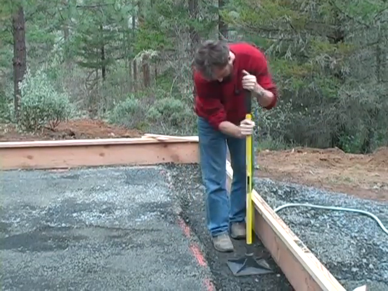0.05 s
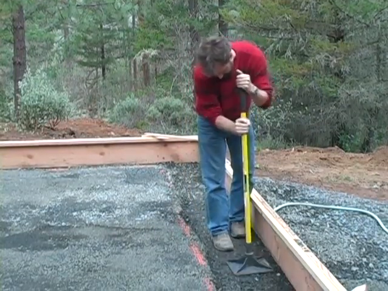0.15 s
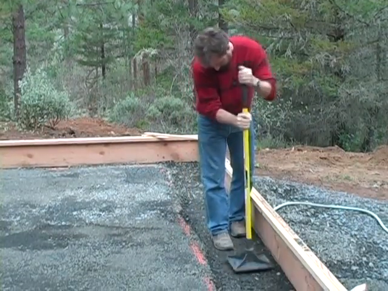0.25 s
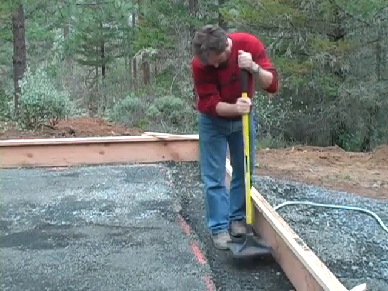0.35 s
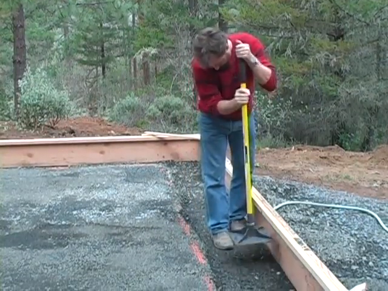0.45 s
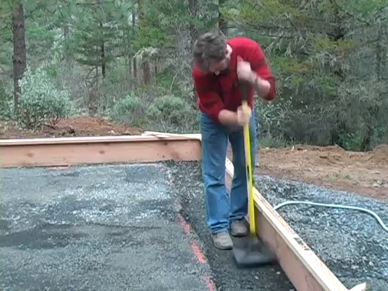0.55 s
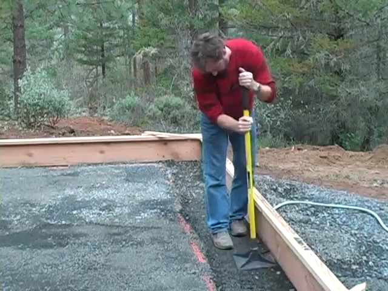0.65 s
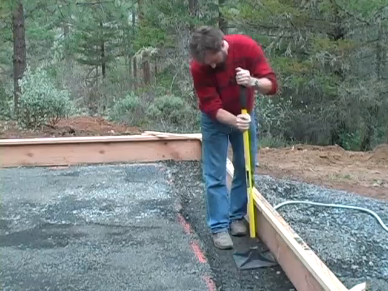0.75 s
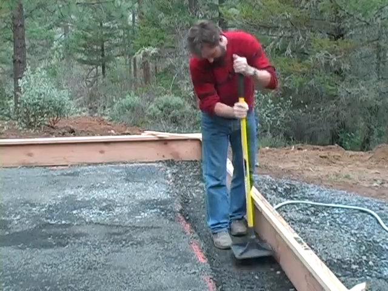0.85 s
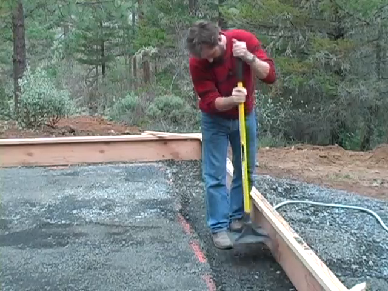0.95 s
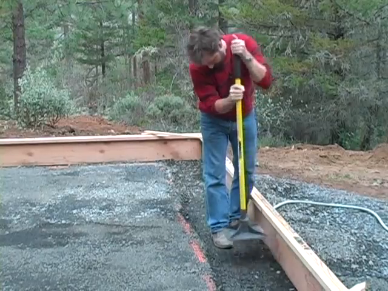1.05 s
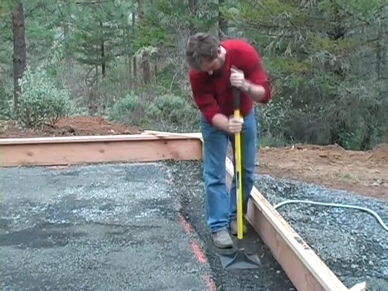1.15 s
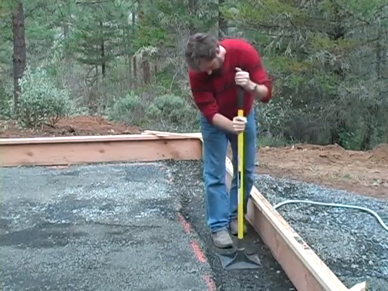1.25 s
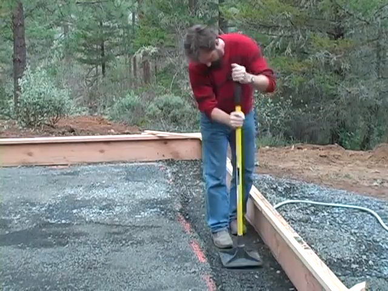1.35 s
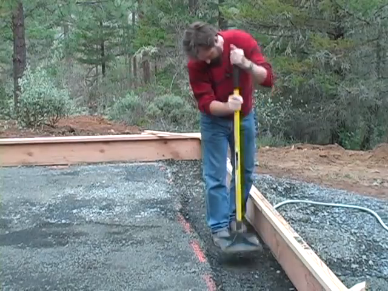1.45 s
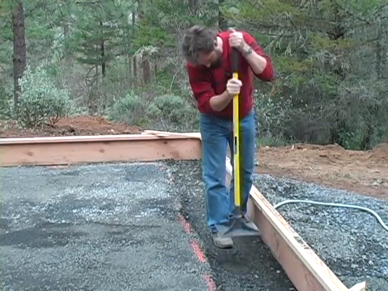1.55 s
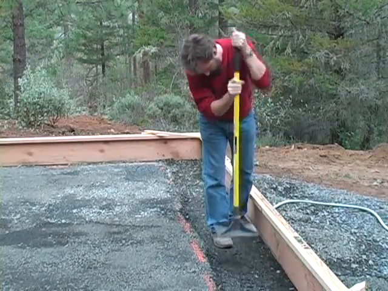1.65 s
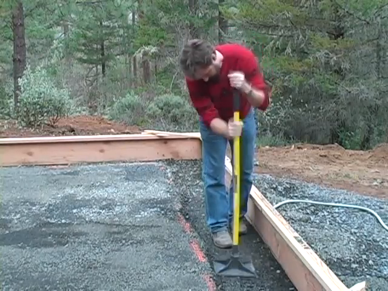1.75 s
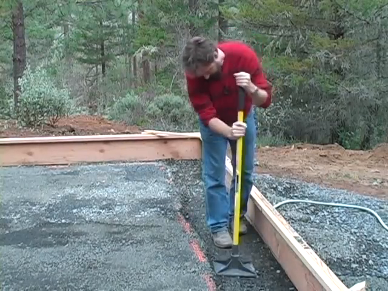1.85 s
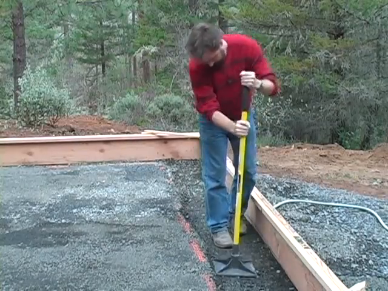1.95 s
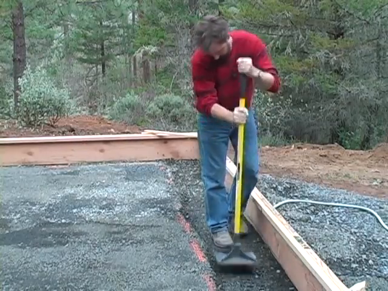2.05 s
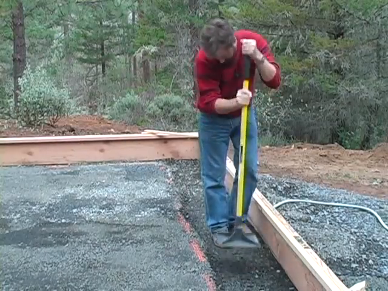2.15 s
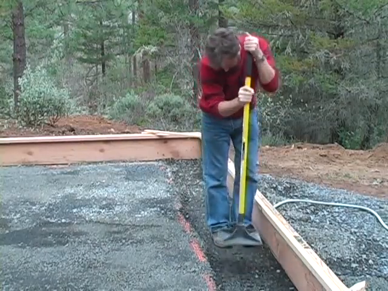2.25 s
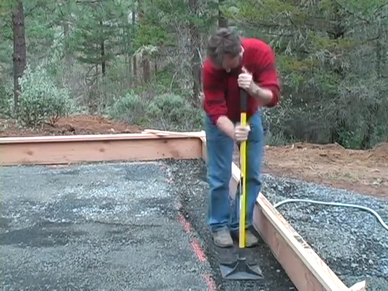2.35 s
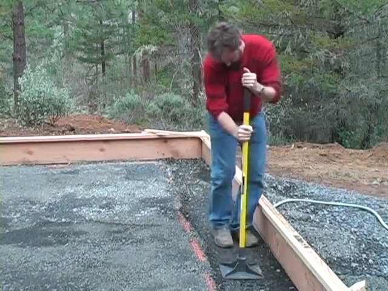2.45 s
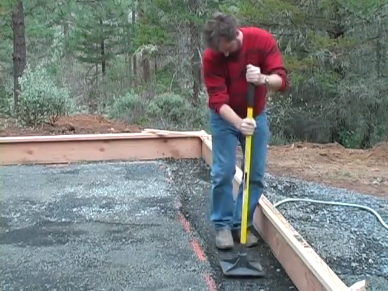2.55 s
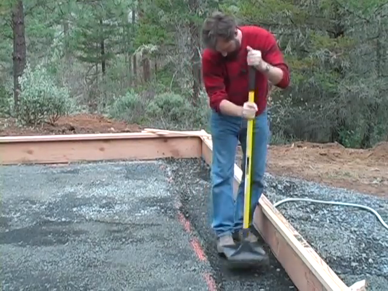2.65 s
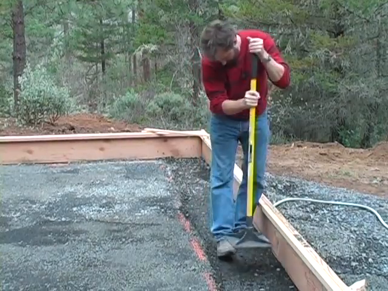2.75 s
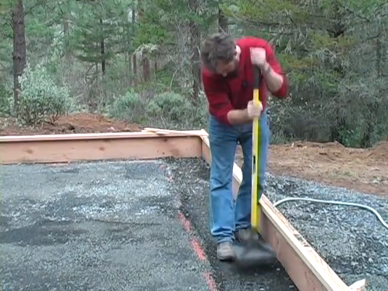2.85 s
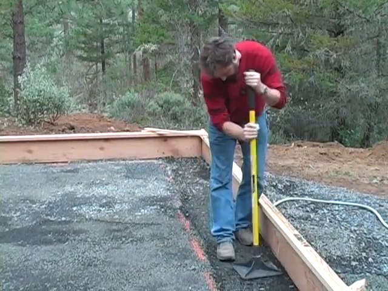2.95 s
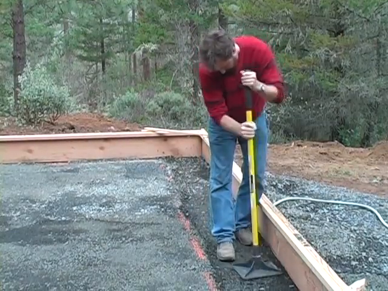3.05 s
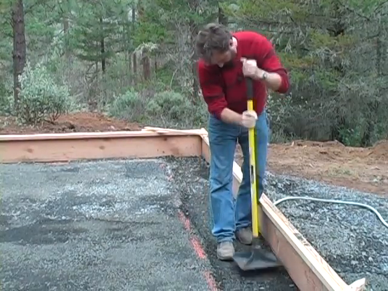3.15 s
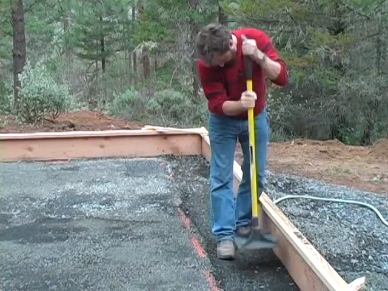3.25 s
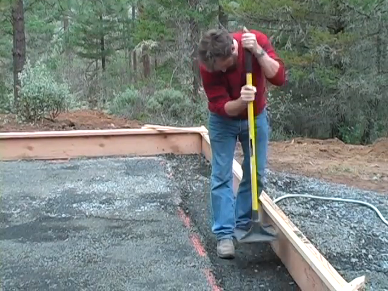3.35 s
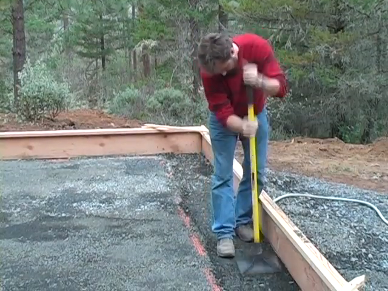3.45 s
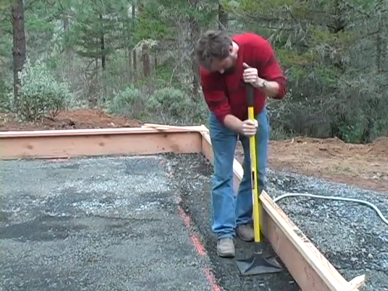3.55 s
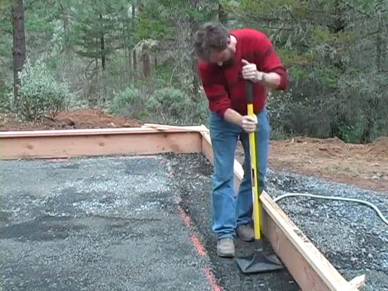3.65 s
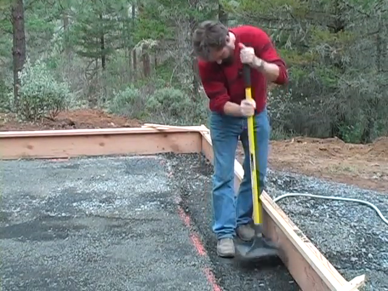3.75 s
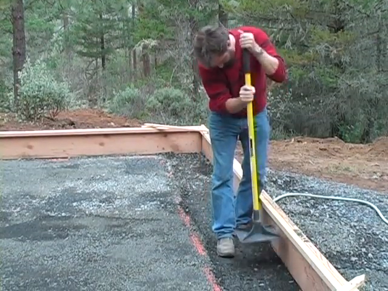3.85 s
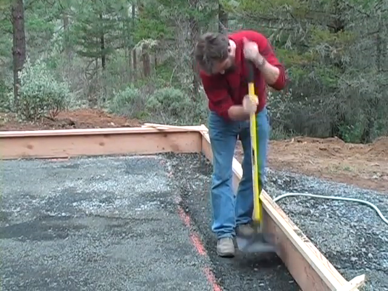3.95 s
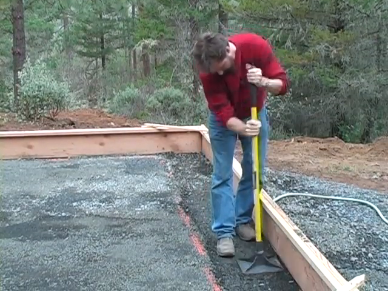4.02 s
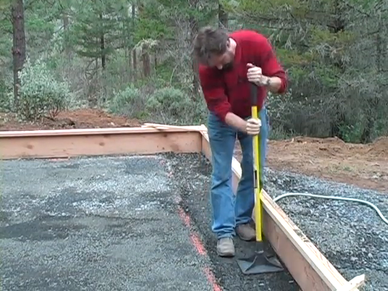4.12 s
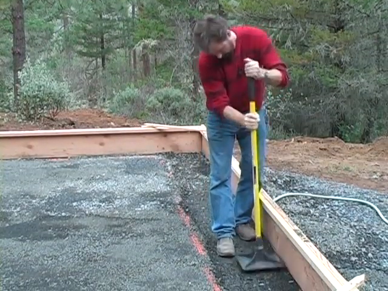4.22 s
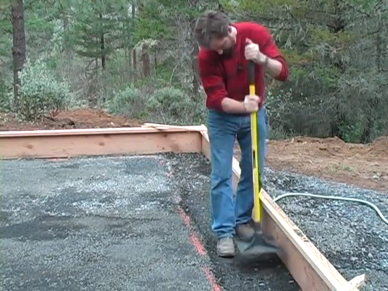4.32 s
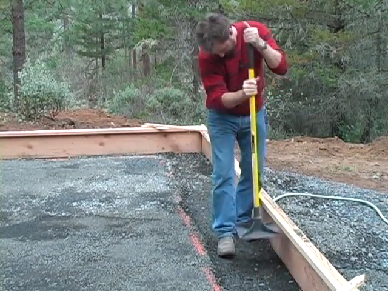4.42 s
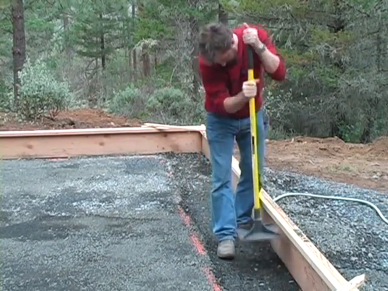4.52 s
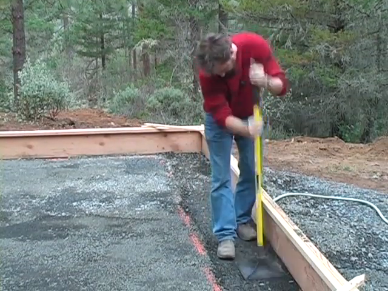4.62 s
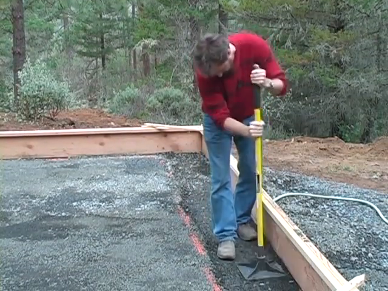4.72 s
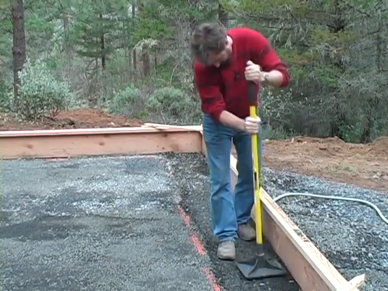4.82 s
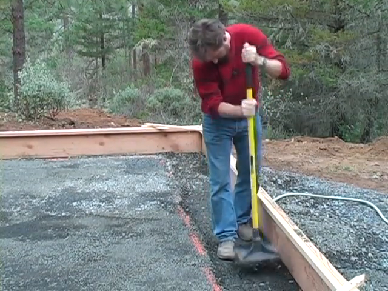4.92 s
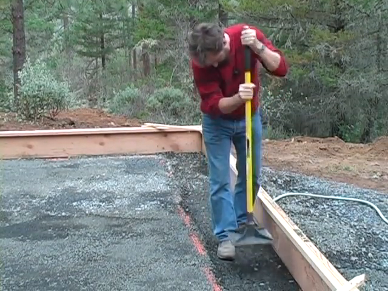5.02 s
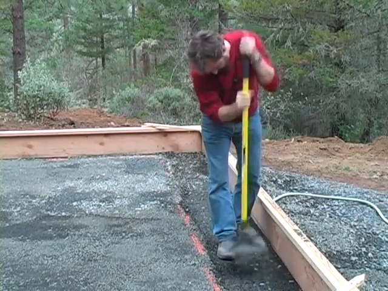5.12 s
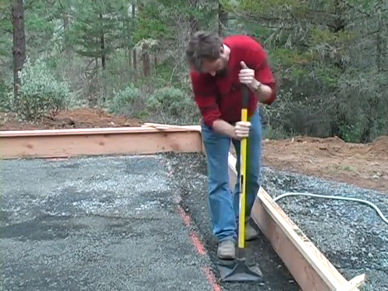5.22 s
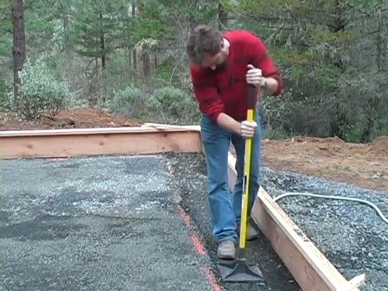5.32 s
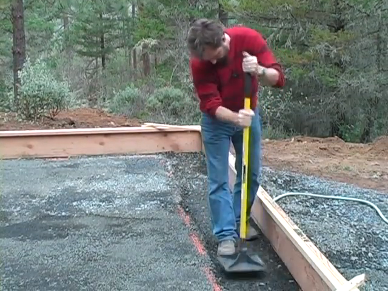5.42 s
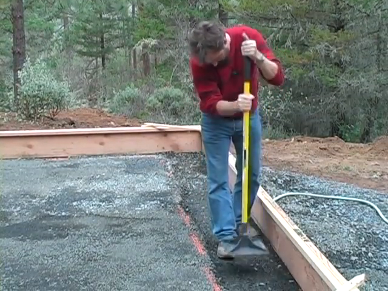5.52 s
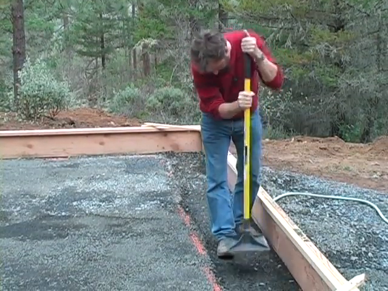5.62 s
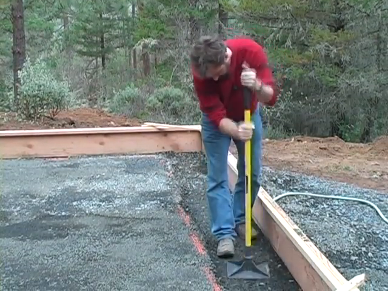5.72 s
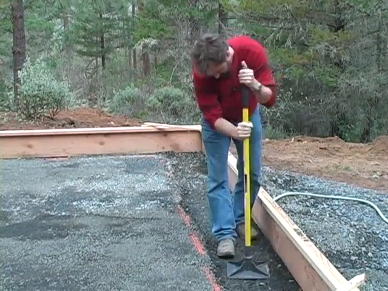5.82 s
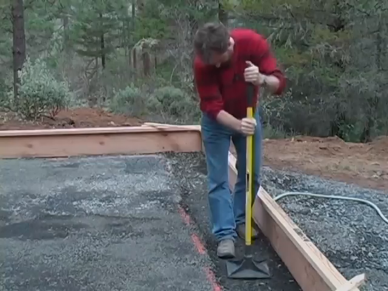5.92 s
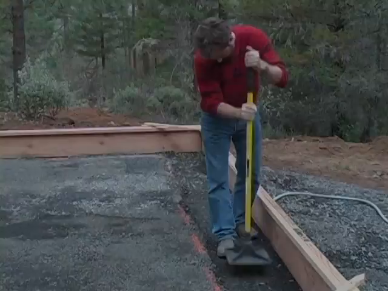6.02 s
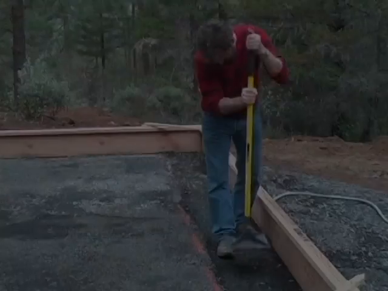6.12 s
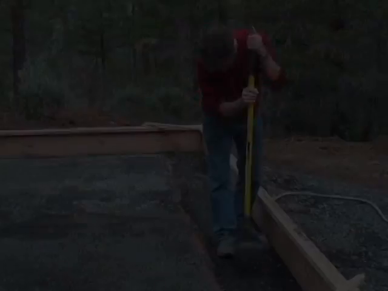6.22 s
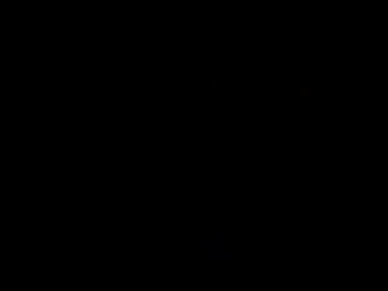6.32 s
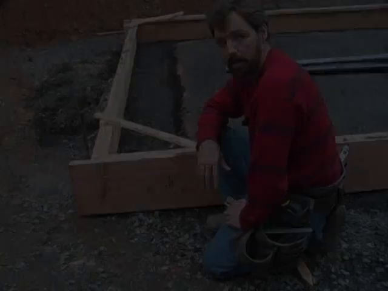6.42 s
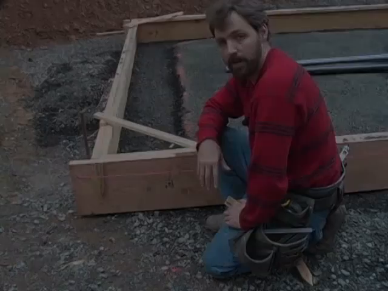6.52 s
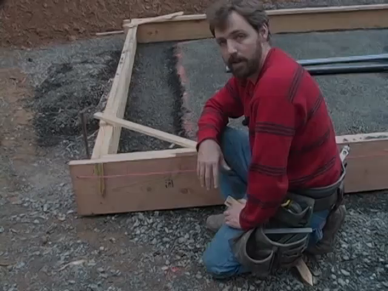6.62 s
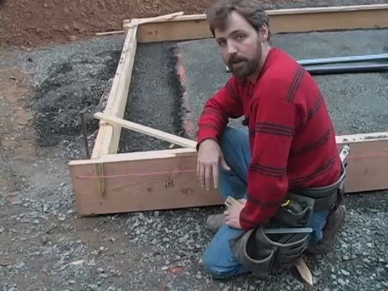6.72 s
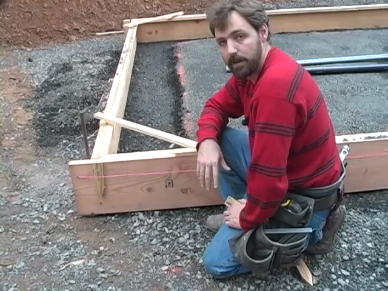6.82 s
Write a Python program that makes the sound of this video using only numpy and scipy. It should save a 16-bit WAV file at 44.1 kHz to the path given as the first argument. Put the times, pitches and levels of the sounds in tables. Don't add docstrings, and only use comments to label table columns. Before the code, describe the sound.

Outdoors, dry and close, a steel hand tamper pounds gravel beneath a small microphone worn on the clothes. Blows fall at about 0.06, 0.6, 1.2, 1.8, 2.4, 2.9, 3.5, 4.0, 4.7, 5.2, 5.75 and 6.34 seconds. Each begins with a bright crunch of cracking stones, then a short, hard thud, clipped by overload; its pitch varies slightly, and a light plate rebound follows around 0.05 seconds later. Grains tick, spill and trickle away in the gaps. Stones clink thinly on the steel near 0.2, 0.7, 1.3 and, ringing clearly, 2.05. A cluster of wooden knocks with a microphone bump comes around 2.2-2.35. Cloth rustles softly throughout, more noticeably near 3.0, 3.4 and 3.95. A stone skids sharply at 5.3. The final blow is loudest, its tail cut at 6.38, leaving very quiet still air and one barely audible dull knock.

```python
import sys
import numpy as np
from scipy import signal
from scipy.fft import rfft, irfft, next_fast_len
from scipy.io import wavfile
from scipy.ndimage import map_coordinates

SR = 44100
rng = np.random.default_rng(int(sys.argv[2]) if len(sys.argv) > 2 else 0)


def ratio_of_db(decibels):
    return 10 ** (np.asarray(decibels, float) / 20)


def dump(signal):
    limited = np.clip(np.atleast_2d(signal).T, -1, 1)
    pcm = np.round(limited * 32767).astype(np.int16)
    wavfile.write(sys.argv[1], SR, pcm)


N = 302967
CHANGE_S = 6.383


def unit(x):
    return x / np.sqrt(np.mean(x ** 2) + 1e-20)


def coloured(x, points):
    size = next_fast_len(len(x) + 4096)
    f, db = np.transpose(points)
    bins = np.fft.rfftfreq(size, 1 / SR)
    gain = ratio_of_db(np.interp(np.log(bins + 1), np.log(f + 1), db))
    return unit(irfft(rfft(x, size) * gain, size)[:len(x)])


def wobble(rate):
    knots = rng.standard_normal(int(N * 300 / SR) + 4)
    return map_coordinates(knots, [np.arange(N) * min(rate, 300) / SR])


def grains(size, spiky_db):
    return unit(rng.standard_normal(size) * ratio_of_db(spiky_db * rng.exponential(size=size)))


def clumps(size, rate, depth_db):
    knots = np.minimum(rng.exponential(size=int(size * 600 / SR) + 4), 3.5) - 1
    place = np.arange(size) * min(rate, 600) / SR
    return unit(ratio_of_db(depth_db * np.interp(place, np.arange(len(knots)), knots)))


def ring(t, hz, t60, attack):
    return np.sin(2 * np.pi * hz * t) * ratio_of_db(-60 * t / t60) * (1 - np.exp(-t / attack))


def through(x, response):
    return signal.fftconvolve(x, response / np.linalg.norm(response))[:len(x)]


def add(track, s, x):
    i = max(round(s * SR), 0)
    track[i:i + len(x)] += x[:len(track) - i]


# t/s, strength/dB, thud f/Hz, crush re strength/dB, upper bed tone/dB
BLOWS = [(.059, -12, 388.2, -1, -5), (0.605, -14.5, 385.8, -4.5, -8), (1.184, -13.5, 393.2, -6, -4),
         (1.782, -10.5, 322.4, -2, 1.5), (2.384, -17, 467.8, -3.5, -2.5), (2.935, -15, 487.8, -1, -5),
         (3.493, -16.5, 498.7, -3.5, -1.5), (4.042, -12.5, 495.2, -8, -6.5),
         (4.661, -14.5, 522, -5.5, -18.5), (5.217, -13, 410.6, -4.5, -16), (5.755, -19, 435.2, 0, 1.5),
         (6.342, -5.5, 447.8, -12.5, -5.5)]
# build-up/s, press/s, upper tone over thud [ratio], linger/dB
LANDINGS = [(0.0037, .0095, 1.52, -0.5), (0.0054, .0095, 2.2, 2.5), (.0025, .007, 1.6, 1.5),
            (.005, 0.0084, 1.9, -0.5), (.002, .006, 1.5, 1.5), (.003, .011, 1.5, 0.5),
            (0.0025, .007, 1.4, 2.5), (.002, .009, 2, 3.5), (0.0025, .008, 1.7, 1), (.004, .008, 1.5, 0),
            (.003, 0.0078, 1.5, -0.5), (0.0043, 0.0089, 1.5, 3)]
# f/Hz, level re crush/dB, extra crush time/s
CRUSH_RINGS = [(4330, -8, .0015), (2613, -6.5, .0005), (1360, -9, 0.00025), (1224, -5, 0.00093),
               (4540, -10, 0.00023), (4650, -9.5, .003), (1102, -4.5, .0003), (1730, -6, .0003),
               (2928, -8, .0003), (3381, -11.5, 0.00022), (2480, -5, 0.00033), (1300, -9, .0003)]


def tamper():
    out, t = np.zeros(N), np.arange(SR // 4) / SR
    for blow, landing, resonance in zip(BLOWS, LANDINGS, CRUSH_RINGS):
        s, db, hz, crush_db, upper_db = blow
        build, press, upper, linger_db = landing
        add(out, s - .004, ratio_of_db(db + 0.83 + crush_db) * crush(t, *resonance))
        add(out, s - .0015, ratio_of_db(db + 10.5) * thud(t, hz, upper_db, press + .001, build, upper, linger_db))
        add(out, s + .005, ratio_of_db(db - 22.5 + linger_db) * boards(t, hz))
        jolt = ring(t, 48 * rng.uniform(.8, 1.3), .13, 0.0044)
        add(out, s + 0.0076, ratio_of_db(db - 18.5) * jolt)
    return out


# f/Hz, level/dB
CRUSH = [(500, -18.5), (1500, -4.5), (2600, 0), (4500, -0.5), (8000, -1.5), (12000, -1), (14500, -2),
         (16000, -12)]


def crush(t, hz, plate_db, longer):
    ends = .0042 + longer
    times = [0, .004, .004 + ends, 0.0047 + ends, 0.011 + ends, .036, .09]
    swell = ratio_of_db(np.interp(t, times, [-34, 2, 4.5, -13.0, -30.5, -52.0, -65.5]))
    sparse = clumps(len(t), 300, 6.5) ** np.clip(t / 0.025, 0, 1)
    x = swell * sparse * clumps(len(t), 810, 0.93) * coloured(grains(len(t), 3), CRUSH)
    mode = ring(np.arange(SR // 50) / SR, hz, .009, .0002)
    return x + ratio_of_db(plate_db) * through(x, mode)


def thud(t, hz, upper_db, press, build=0.00073, upper=1.4, linger_db=0):
    sagging = t * (1 + .08 * np.exp(-t / .01))
    bed = ring(sagging, hz * .96, 0.048, 0.0012)
    bed = bed + ratio_of_db(upper_db) * ring(sagging, hz * upper, 0.042, 0.0012)
    for ratio, db in [(.62, -10), (.84, -7.5), (1.2, -9.5), (2.3, -19), (3.1, -21.5)]:
        pitch = hz * ratio * (1 + rng.normal(0, .04))
        bed = bed + ratio_of_db(db) * rng.choice([-1, 1]) * ring(t, pitch, .045, 0.0002)
    times = np.maximum.accumulate([0, build, press * 0.81, press, press + 0.0013, press + 0.026])
    return bed * ratio_of_db(np.interp(t, times, [-26, 2.5, 2, -10.5, -16 + linger_db, -32.5 + linger_db]))


def boards(t, hz):
    band = [(60, -16), (hz * .5, -6), (hz, 0), (hz * 1.7, -8), (2500, -36)]
    rattle = coloured(rng.standard_normal(len(t)), band)
    return ratio_of_db(-60 * t / 0.14) * (1 - np.exp(-t / 0.00067)) * rattle


# t/s, peak level/dB, thud f/Hz, grit re thud/dB
REBOUNDS = [(0.102, -40.5, 422, -5.5), (0.110, -30, 323, -10), (0.644, -37.5, 333, -9),
            (1.218, -39.5, 488, -9), (1.2297, -48.5, 1185, -7), (1.831, -25.5, 372, -14),
            (2.425, -38.5, 300, -4.5), (2.985, -39, 800, 0), (2.996, -39.5, 790, -2.5),
            (3.535, -38, 507, -4), (4.09, -46.5, 600, -5.5), (4.709, -53.5, 639, -0.5),
            (5.264, -40, 500, -0.5), (5.3137, -44.5, 910, -12.5), (5.797, -33, 558, -5.5),
            (5.804, -27.5, 289, -19)]
# f/Hz, level/dB
SLUMP = [(400, -15.5), (1500, -4), (4500, 0), (14000, -8), (16000, -19)]


def rebounds():
    out, t = np.zeros(N), np.arange(SR // 4) / SR
    for s, db, hz, grit_db in REBOUNDS:
        add(out, s + 0.0012, ratio_of_db(db + 2.5) * thud(t, hz, -8.0, 0.0037))
        swell = ratio_of_db(np.interp(t, [0, .01, .018, .027, .07], [-24.0, 0.5, 1.0, -14.0, -36]))
        slump = swell * clumps(len(t), 450, 4) * coloured(grains(len(t), 1.8), SLUMP)
        add(out, s - .01, ratio_of_db(db + grit_db - 9) * slump)
    return out


# t/s, level/dB, f/Hz
TICKS = [(0.1076, -47.5, 7100), (0.1451, -39.5, 5550), (5.776, -48.5, 4980), (0.6509, -50, 6400),
         (0.6974, -51, 9800), (1.202, -37.5, 6900), (1.2794, -49, 10300), (1.3163, -54, 11000),
         (1.8012, -56.5, 7540), (1.8327, -41, 7000), (1.8555, -45.5, 6400), (1.8672, -45, 5930),
         (2.4295, -48, 6400), (2.4711, -51.5, 9900), (2.5067, -39.5, 11000), (3.02, -57, 7960),
         (2.9522, -38, 4860), (2.974, -48, 6000), (3.0014, -42, 5800), (3.033, -36.5, 5630),
         (3.5024, -32.5, 6150), (3.5499, -40, 6200), (3.5716, -53, 5940), (4.6673, -32, 4620),
         (4.7124, -43.5, 8500), (5.236, -44, 7500), (5.3007, -46, 8300), (5.805, -35, 4250),
         (6.3513, -29, 6100), (6.3629, -39.5, 6630),
         (.6135, -39, 5200), (.6245, -51, 7000), (0.677, -56, 8500), (.746, -74, 5500), (.797, -64, 4230),
          (1.267, -58, 10600), (1.340, -60, 10000), (1.344, -61, 9400), (1.372, -59, 9100),
          (1.908, -57, 6120), (2.329, -62, 6000), (2.359, -65, 10000), (2.404, -49.5, 5500),
          (2.443, -53.5, 6500), (2.4897, -50.5, 9000), (2.612, -69, 5340), (2.619, -69, 5200),
          (2.987, -48, 4500), (3.047, -60, 11000), (3.052, -62, 9500), (3.068, -65, 11000),
          (3.119, -62, 9500), (3.271, -67, 5000), (3.324, -72.5, 5500), (3.527, -52, 6290),
          (3.595, -58, 3570), (4.679, -51, 7500), (4.688, -48.5, 5500), (4.753, -58, 11400),
          (4.8854, -50.5, 4770), (5.267, -52, 9500), (5.393, -61, 7500), (5.408, -60, 5800),
          (5.623, -67, 7500), (.331, -64.5, 7800), (0.3, -67, 7000),
         (0.412, -64, 10850), (0.7788, -64, 8600), (0.811, -59, 6460), (0.925, -73, 2960),
         (1.3791, -51.5, 6800), (1.4624, -67, 8300), (2.1702, -60, 9400), (1.927, -56, 6200),
         (2.1609, -58.5, 12200), (2.268, -63, 4240), (2.2875, -60, 9000), (2.5373, -53, 11100),
         (2.5857, -57.5, 5640), (2.8945, -61, 6700), (3.5823, -55, 10400), (4.1363, -58, 7730),
         (4.2334, -54.5, 7400), (4.4382, -60.5, 4800), (4.7627, -59, 8900), (4.8567, -58, 6700),
         (4.867, -54, 6420), (4.9209, -60.5, 5950), (4.9753, -65, 7400), (5.3444, -56, 4470),
         (5.469, -64, 7870), (5.4824, -45.5, 10470), (5.59, -65, 11940), (5.6091, -51.5, 9400),
         (6.157, -67, 4430), (5.907, -57, 5140)]


def ticks():
    out, t = np.zeros(N), np.arange(400) / SR
    shape = (np.exp(-t / 0.00046) + .15 * np.exp(-t / .0025)) * (1 - np.exp(-t / 0.00041))
    for s, db, hz in TICKS + strays():
        band = [(hz * .35, -36), (hz * .7, -10), (hz, 0), (hz * 1.35, -7), (hz * 3, -11)]
        crack = unit(shape * coloured(rng.standard_normal(len(t)), band))
        add(out, s - .0006, ratio_of_db(db - 9.0) * (crack + 1.1 * ring(t, hz, 0.015, 0.00054)))
    return out


def strays(count=5):
    late, size, tone = rng.random((3, len(BLOWS), count))
    s = np.array(BLOWS)[:, :1] + 0.051 + 0.32 * late ** 1.1
    db = -63 - 35 * 0.46 * late ** 1.5 - 6 * size
    hz = 7000 * 2 ** (1.4 * tone - .7)
    return list(zip(s.ravel(), db.ravel(), hz.ravel()))


# t/s, peak level/dB, crumble length/s, plate ring re peak/dB
STONES = [(0.147, -33, 0.027, -26.5), (0.174, -28, 0.028, -28), (1.3175, -42, 0.021, -6),
          (1.885, -30, 0.018, -18), (2.492, -38, 0.013, -18.5), (2.503, -33, 0.048, -16),
          (3.111, -48.5, 0.018, 0), (3.603, -32.5, 0.021, -18), (3.7426, -42, 0.044, -7),
          (4.211, -61, .018, -1), (4.889, -46, 0.03, -11), (5.313, -24.5, 0.012, -26),
          (5.371, -39.5, 0.026, -6.5), (5.8326, -31.5, 0.022, -22), (5.927, -48, 0.03, -3.5),
          (2.593, -55, 0.018, -2)]
# f/Hz, level/dB, t60/s
SKID = [(2326, -8, .35), (2912, -8, .2), (3700, -1, .26), (4340, -2, .16), (5963, -5, .14), (6400, -7, .14),
        (7190, -8, .12), (7940, -7, .14), (8660, -7, .1), (9030, -6, .1), (10800, -10, .1), (12240, -8, .1)]


def stones():
    out, t = np.zeros(N), np.arange(SR // 2) / SR
    for s, db, length, ring_db in STONES:
        modes = [(hz, level + rng.normal(0, 2.5), t60) for hz, level, t60 in SKID]
        skid = crumble(t, length) + ratio_of_db(ring_db) * plate(t, modes)
        add(out, s, ratio_of_db(db - 21.0) * (1 - np.exp(-t / 0.00041)) * skid)
    return out


def crumble(t, length):
    return ratio_of_db(-30 * t / length) * coloured(grains(len(t), 1.2), CRUSH)


def plate(t, modes):
    out = np.zeros(len(t))
    for hz, db, t60 in modes:
        beat = 1 + .3 * np.cos(2 * np.pi * (rng.uniform(8, 30) * t + .2 * rng.random()))
        attack = .04 if 2000 < hz < 2500 else .0004
        out += ratio_of_db(db) * beat * ring(t, hz, t60, attack)
    return out


# t/s, peak level/dB, ring re peak/dB
CLINKS = [
    (0.2194, -43, -8),
    (0.6889, -37.5, -25),
    (1.2717, -39, -13.5),
    (2.0537, -44, 1),
]
# f/Hz, level/dB, t60/s
PLATE = [
    [(2326, -2, .65), (2912, -4, .5), (3198, -6, .6), (3666, -3, .55), (3750, -10, .4), (4264, -8, .3),
     (7940, -5, .35), (5502, -4, .14), (5900, -2, 0.18), (6470, -7, 0.23), (7190, -26, .15),
     (8800, -8, 0.15), (9100, 6, 0.1), (12240, -3, 0.16)],
    [(3700, 7.5, 0.38), (4300, -6, .06), (6400, -4, .07), (7500, -6, .07), (11450, -15, 0.11)],
    [(3656, 0, 0.4), (4300, -14, .13), (10840, -12, 0.38), (12070, -18, .3), (13290, -18, 0.18)],
    [(2270, -5, 0.28), (3193, -1.5, 0.34), (3760, -4, 0.19), (4280, -11, 0.16), (4900, -5.5, 0.17),
     (5930, -11, 0.12), (1010, -15.5, 0.22), (6400, -8, 0.17), (7100, -11, 0.21), (7900, -7, 0.14),
     (9080, 0, 0.1), (10400, -7, 0.1)],
]


def clinks():
    out, t = np.zeros(N), np.arange(SR // 2) / SR
    for (s, db, ring_db), modes in zip(CLINKS, PLATE):
        add(out, s, ratio_of_db(db - 10.5) * (1.34 * crumble(t, 0.019) + ratio_of_db(ring_db) * plate(t, modes)))
    return out


# t/s, peak level/dB, f/Hz
KNOCKS = [(0.248, -42.5, 968), (0.814, -46, 1850), (.843, -60.5, 1900), (1.1554, -53, 2100),
          (1.3694, -46, 1870), (2.1641, -56, 1950), (2.2745, -40, 1300), (2.302, -48, 1500),
          (2.310, -33, 1810), (2.335, -21.5, 1520), (2.365, -50, 1200), (2.506, -46, 1030),
          (2.715, -54, 700), (3.6423, -47, 907), (3.953, -48.5, 1686), (4.4884, -55, 1626),
          (4.639, -54.5, 1490), (4.9748, -55, 1620), (4.987, -53, 1500), (5.3434, -52, 1450),
          (5.39, -47, 1600), (5.397, -55, 1700), (5.5649, -58, 1460), (5.5899, -55, 1497),
          (5.622, -57, 1990), (5.657, -56, 2260), (5.7216, -53.5, 1910), (5.74, -59, 1990),
          (5.8972, -53, 2160), (6.425, -55.5, 412)]


def knocks():
    out, t = np.zeros(N), np.arange(SR // 2) / SR
    for s, db, hz in KNOCKS:
        wood = ring(t, hz, 0.0074, 0.00018)
        wood += 0.46 * ring(t, hz * 0.65, 0.008, 0.0003)
        wood += .4 * ring(t, hz * 1.1, 0.0029, .0002)
        add(out, s + 0.00068, ratio_of_db(db - 4.5) * wood)
    return out


# t/s, peak level/dB, f/Hz, t60/s
BUMPS = [
    (2.227, -26.5, 106.4, 0.046),
    (3.345, -41, 85.3, 0.076),
    (4.921, -47, 102.7, 0.17),
]


def bumps():
    out, t = np.zeros(N), np.arange(SR // 4) / SR
    for s, db, hz, t60 in BUMPS:
        onset = 1 - np.exp(-t / 0.0026)
        hurried = t + 0.0041 * onset
        add(out, s + .004, ratio_of_db(db + 14.5) * ring(hurried, hz * 0.84, t60, 0.0045) * onset)
    return out


# level/dB of rumble, cloth, rub, grit
REST_DB = (-73.5, -70.5, -80, -92)
QUIET_SPOT_DB = (-85, -80.5, -86, -105)


def resting(t):
    return [ratio_of_db(np.interp(t, [CHANGE_S, CHANGE_S + 0.048], pair)) for pair in zip(REST_DB, QUIET_SPOT_DB)]


# peak t/s, half length/s, cloth level/dB, rub
# re cloth/dB, rumble re cloth/dB
RUSTLES = [(0.258, 0.032, -72.5, -4, 11.5), (0.505, 0.11, -76.5, -10, -0.5), (0.691, 0.038, -65, -18, 10.5),
           (1.02, 0.072, -72, -17, 2), (1.533, 0.082, -73, -9, 3), (1.719, 0.038, -75.5, -7.5, 4),
           (1.881, 0.065, -69, -5.5, 6), (2.229, 0.068, -65, -0.5, 7), (2.277, 0.018, -55, -7.5, -10),
           (2.35, 0.043, -59, -7.5, 1.5), (2.517, 0.059, -73.5, -9, 7.5), (2.831, 0.07, -67, 0, -18),
           (2.992, 0.037, -53.5, -6, -4.5), (3.225, 0.064, -69, -10, -5), (3.396, 0.078, -58, -15, -4),
           (3.57, 0.03, -69, -9.5, 6.5), (3.945, 0.049, -56, -16.5, 3), (4.115, 0.09, -72, -10, 9.5),
           (4.514, 0.041, -60.5, -3, -2), (4.624, 0.051, -68.5, -10, 1.5), (4.978, 0.19, -74.5, -17, 10.5),
           (5.314, 0.12, -70, 1, 9.5), (5.663, 0.098, -70, -8.5, -0.5), (5.878, 0.054, -80.5, -1, 12.5),
           (6.247, 0.096, -61, -13.5, -5),
           (1.362, 0.044, -84, -2, 5),
    (3.666, 0.02, -88, 5, 2),
    (4.255, 0.048, -79, -1, 3),
]
# f/Hz, level/dB per Hz
RUMBLE = [(12, -51), (20, -19), (54, 1.5), (83, 3), (150, -11.5), (200, -28), (330, -120)]
CLOTH = [(65, -25), (110, -3), (242, -4.5), (274, -8.5), (405, -10.5), (800, -23.5), (1040, -54),
         (1760, -120)]
RUB = [(350, -21), (600, 0.5), (900, -2.5), (1250, -3), (1650, -1), (2100, -8), (3200, -17.5), (6600, -120)]
# f/Hz, level/dB per Hz
GRIT = [(1290, -34), (2200, -0.5), (3680, 1), (4000, 1.5), (4320, 0.5), (12300, -8.5), (14800, -11),
        (16500, -35)]


def clothes():
    t = np.arange(0, N, 44) / SR
    rumble, cloth, rub, _ = resting(t)
    for s, half, db, rub_db, rumble_db in RUSTLES:
        swell = ratio_of_db(db) * np.exp(-((t - s) / half) ** 4)
        rumble = rumble + ratio_of_db(rumble_db) * swell
        cloth = cloth + swell
        rub = rub + ratio_of_db(rub_db) * swell
    rumble, cloth, rub = (np.interp(np.arange(N) / SR, t, gain) for gain in (rumble, cloth, rub))
    shake = wobble(25)
    out = rumble * ratio_of_db(4.9 * wobble(36) + 2.2 * wobble(11.0)) * coloured(rng.standard_normal(N), RUMBLE)
    out += cloth * ratio_of_db(0.67 * shake) * coloured(grains(N, 2.5), CLOTH)
    slips = ratio_of_db(0.99 * shake + 1.6 * wobble(12)) * clumps(N, 180, 4)
    out += rub * slips * coloured(grains(N, 2.0), RUB)
    out += ratio_of_db(-13) * rub * coloured(grains(N, 1.7), GRIT)
    return out


# start level/dB, fall/dB per s
TRICKLES = [(-65.5, 69.5), (-72, 70), (-64, 69), (-64, 89.5), (-63.5, 78.5), (-61.5, 78), (-68.5, 65.5),
            (-64, 67.5), (-65.5, 73.5), (-62.5, 72), (-63, 99)]


def trickle():
    t = np.arange(0, N, 44) / SR
    gain = resting(t)[3]
    for blow, (db, fall) in zip(BLOWS, TRICKLES):
        since = t - blow[0]
        gain = gain + (since > 0) * ratio_of_db(db - fall * np.abs(since))
    gain = np.interp(np.arange(N) / SR, t, gain)
    flow = clumps(N, 300, 5.5) * clumps(N, 70, 4)
    taps = gain * unit(flow ** 2) * rng.standard_normal(N)
    steel = plate(np.arange(SR // 4) / SR, SKID)
    return gain * unit(flow) * coloured(grains(N, 1.0), GRIT) + ratio_of_db(-10) * through(taps, steel)


# f/Hz, level/dB per Hz
AIR = [(24, -43), (40, -11.5), (87, 1), (2380, -18), (2700, -13.5), (3650, -15.5), (14800, -14.5),
       (16000, -20.5)]


def air(before_change):
    return ratio_of_db(-86 + 4 * (1.5 - before_change)) * coloured(rng.standard_normal(N), AIR)


def hush():
    t = np.arange(N) / SR
    dip = np.array([-.0072, -.0052, 0, .002])
    ahead = sum(np.interp(t, s - .004 + dip, [0, 1, 1, 0]) for s, *_ in BLOWS)
    return ratio_of_db(-10.5 * ahead)


def scene():
    before_change = np.clip((CHANGE_S - np.arange(N) / SR) / 0.0034, 0, 1)
    pounding = (tamper() + rebounds() + ticks()) * before_change
    loose = stones() + clinks() + knocks() + bumps()
    faint = hush() * (clothes() + trickle() + air(before_change))
    return (pounding + loose + faint)[None]


def low_pass(x):
    return signal.sosfilt(signal.butter(12, 16660, fs=SR, output="sos"), x)


def record(dry):
    clipped = dry / (1 + np.abs(dry / 0.13) ** 7) ** (1 / 7)
    tilted = signal.lfilter(*signal.butter(N=1, Wn=30, btype="high", fs=SR), clipped)
    limited = signal.sosfilt(signal.cheby2(N=6, rs=40, Wn=16800, fs=SR, output="sos"), tilted)
    return low_pass(limited)


dry = scene()
out = record(dry)
dump(out)
```